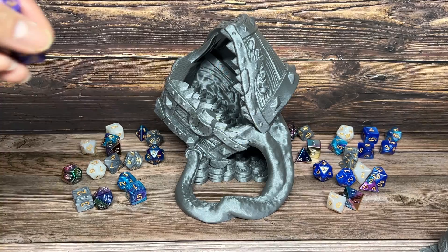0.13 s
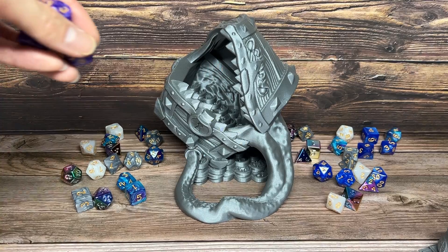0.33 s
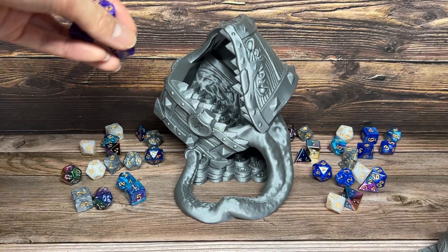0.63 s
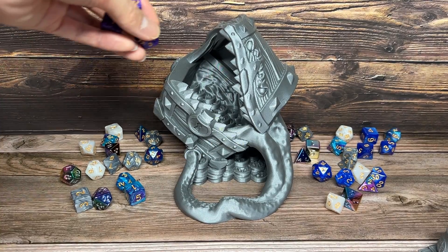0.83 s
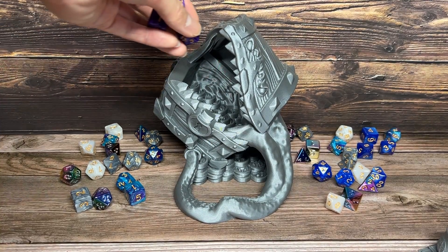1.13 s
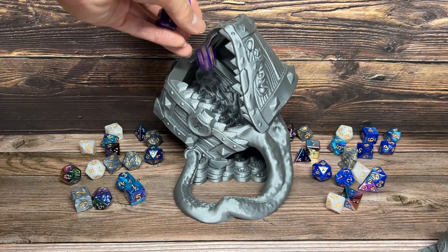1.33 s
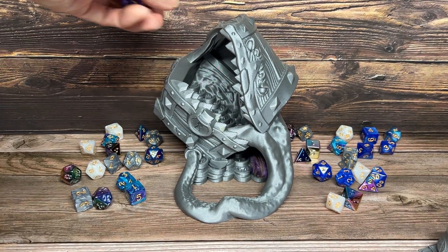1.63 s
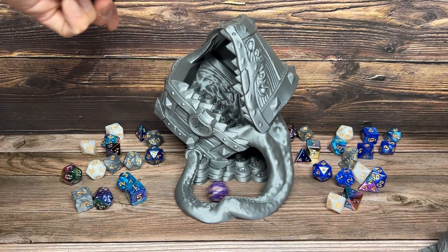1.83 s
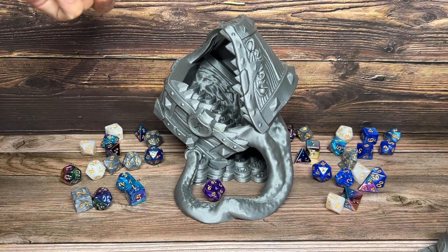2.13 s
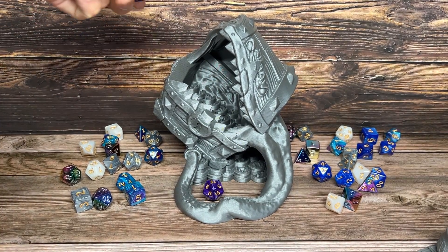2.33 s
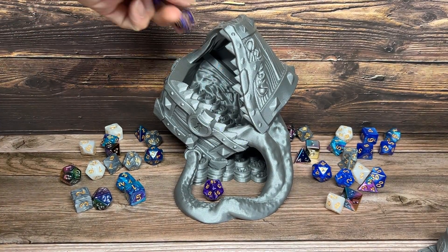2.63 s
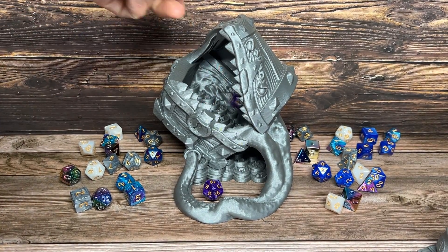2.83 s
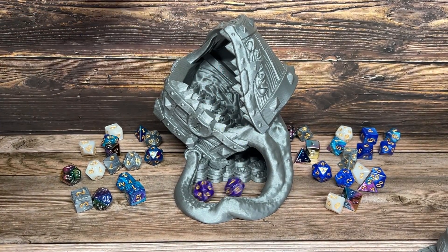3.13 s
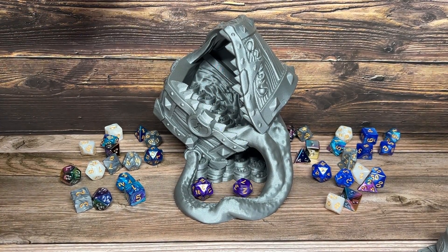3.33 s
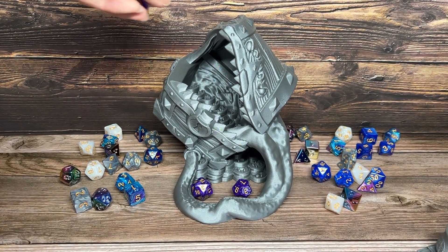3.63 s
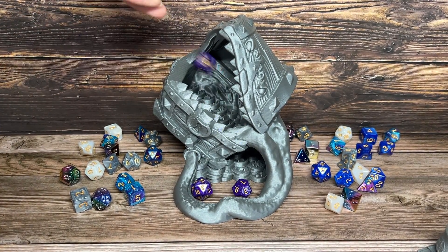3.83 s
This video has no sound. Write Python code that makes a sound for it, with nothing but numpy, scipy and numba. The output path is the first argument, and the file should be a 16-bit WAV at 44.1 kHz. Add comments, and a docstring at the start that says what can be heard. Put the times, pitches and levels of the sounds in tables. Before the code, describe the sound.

Plastic dice clatter one after another through a hollow plastic tower; two bounce out onto wood, the third is still knocking at the end. Small room, close phone microphone, faint low hum.

```python
"""Plastic dice, three in all, drop one after another into a hollow plastic tower on a wooden table.
Each knock sets off short rings, with noise for the crack and a low thud; the first two dice bounce
out on the wood, the third is still knocking in the tower near the end. Two thin clicks are dice touching.
A small room answers with a fading noise tail, over a low hum of shaped noise and a wavering tone.
A phone close by turns its gain down after the first loud knock."""
import sys
import numpy as np
from scipy import signal
from scipy.fft import rfft, irfft
from scipy.io import wavfile
from scipy.ndimage import uniform_filter1d
from numba import njit

SR = 44100
rng = np.random.default_rng(int(sys.argv[2]) if len(sys.argv) > 2 else 0)


def persist_wave(psi):
    """Save psi, clipped to +-1, as 16-bit WAV."""
    counts = np.round(np.clip(psi, -1, 1) * 32767).astype(np.int16)
    wavfile.write(sys.argv[1], SR, np.atleast_2d(counts).T)


N = 176400  # samples: 4 s


def undb(db):
    """Turn decibels into a plain factor."""
    return 10 ** (np.asarray(db) / 20)


def curve(table, size):
    """Read a table of (f/Hz, value) at every frequency of an FFT, along a logarithmic pitch scale."""
    hz, value = np.array(table).T
    fft_hz = np.fft.rfftfreq(size, 1 / SR)
    return np.interp(np.log(fft_hz + 1), np.log(hz), value)


def colour(x, table):
    """Make each frequency louder or softer, as a table of (f/Hz, level/dB) says."""
    size = x.shape[-1]
    return irfft(rfft(x) * undb(curve(table, size)), size)


def fall(t, t60):
    """Fade that drops by 60 dB in t60 seconds, as ringing things do."""
    return np.exp(-np.log(1000) * t / t60)


def add(out, at, sound, pan_db):
    """Mix in a sound at a time in seconds; pan_db is how much louder the left is than the right."""
    start = int(at * SR)
    length = min(sound.shape[-1], N - start)
    sides = undb(np.array([[pan_db], [-pan_db]]) / 2)
    out[:, start:start + length] += sound[..., :length] * sides


def hum():
    """Low rumble and hiss are noise shaped in pitch; a motor adds a low tone of wavering level."""
    # Colour of the noise, whose overall level is set below: f/Hz, level/dB
    noise_colour = [(20, -39), (40, -9.5), (48, -15), (70, -6.5), (110, -18), (135, -19), (150, -10),
                    (190, -8.5), (250, -20.5), (320, -15.5), (415, -26.5), (480, -22.5), (570, -29.5),
                    (730, -29), (1140, -38), (1500, -35.5), (1800, -41), (2060, -38), (2620, -43),
                    (6320, -53), (8710, -61), (10200, -77.5), (11700, -66.5), (13000, -78.5)]
    # Side (left against right) compared with the middle: f/Hz, level/dB
    side_colour = [(60, -20.5), (110, -9), (200, -18), (380, -2.5), (700, -4), (1290, 0.5), (2380, -1.5),
                   (4400, -1), (8120, 4.5), (15000, 0)]
    noise_db, motor_db = -51.5, -52  # RMS levels, of the middle noise and of the tone before its waver
    motor_hz, motor_waver = 48, .3

    mid, side = colour(rng.standard_normal((2, N)), noise_colour)
    side = colour(side, side_colour)
    noise = np.array([mid + side, mid - side]) * undb(noise_db) / np.std(mid)
    waver = uniform_filter1d(rng.standard_normal(N), size=4000)  # slow random drift
    waver = 1 + motor_waver * waver / np.std(waver)
    tone = np.sin(2 * np.pi * motor_hz * np.arange(N) / SR) * waver
    return noise + np.sqrt(2) * undb(motor_db) * tone


def knocks(rows, modes, gain_db, contact_s):
    """A die chatters briefly against a surface that rings, with a crack of noise above and a thud below.

    Returns the near sound and the smooth click that feeds the room.
    """
    # Edges of the six bands low, body, middle, upper, click, tick: f/Hz
    band_edges = [400, 900, 1450, 2050, 3500, 7000, 15000]
    # Slow ringing of the table top: f/Hz, level/dB, t60/s
    thud_modes = [(113.4, -5, 0.086), (142.6, 2.1, .12), (227.6, -0.5, 0.13), (320.8, 4.5, 0.059)]
    scatter_db, detune = 2.0, .012  # random spread of the partials; detune is a share at 1 kHz, wider above
    clack_cycles, ring_db = 28, -13  # the main part fades 60 dB in these cycles, a share rings on
    rise_cycles, thud_rise_s = .55, 0.0094
    apart_rad, lag_s = .8, 4.5e-5  # phase spread between two microphone ports; the left one hears later
    chatter = .15  # strength against the first touch
    crack_t60_s, crack_db, crack_side_db = .02, 3.0, -2
    thud_gain_db = 4

    out = np.zeros((2, 2, N))
    t = np.arange(4600) / SR
    left_right = np.array([[1], [-1]])
    bands = [signal.butter(2, [low, high], "band", fs=SR, output="sos")
             for low, high in zip(band_edges[:-1], band_edges[1:])]
    clicks = np.array([signal.sosfilt(sos, 1. * (t == 0)) for sos in bands])
    clicks = 20 * clicks / np.linalg.norm(clicks, axis=1)[:, None]  # equal energy in every band

    # Each mode is a cluster of three close partials
    hz, db, t60 = np.repeat(np.array(modes), 3, axis=0).T[:, :, None]
    band = np.searchsorted(band_edges, hz[:, 0]) - 1
    decay = fall(t, clack_cycles / hz) + undb(ring_db) * fall(t, t60)
    decay = decay * (1 - np.exp(-t * hz / rise_cycles)) ** 2
    lag = np.pi * lag_s * hz.T * left_right
    apart = apart_rad * np.minimum(hz.T / 1000, 1)
    low_hz, low_db, low_t60 = np.array(thud_modes).T[:, :, None]

    for at, peak_db, *share_db, thud_db, pan_db in rows:
        level = undb(peak_db + gain_db)

        mode_level = undb(db + scatter_db * rng.standard_normal(hz.shape))
        mode_hz = hz * (1 + detune * hz / 1000 * rng.standard_normal(hz.shape))
        ring = mode_level * decay * np.exp(2j * np.pi * mode_hz * t)
        phase = 2 * rng.standard_normal(len(hz))
        turn = np.exp(1j * (apart * rng.standard_normal((2, len(hz))) - lag + phase))

        push = chatter * rng.standard_normal(512) * np.exp(-(t[:512] / contact_s) ** 2)
        push[0] = 1  # the first touch

        low_phase = rng.standard_normal(low_hz.shape)
        thud = undb(low_db) * fall(t, low_t60) * np.sin(2 * np.pi * low_hz * t + low_phase)
        thud = thud.sum(axis=0) * (1 - np.exp(-t / thud_rise_s))
        sound = undb(thud_db + thud_gain_db) * thud

        for b, share in enumerate(share_db):
            part = (turn[:, band == b] @ ring[band == b]).imag
            part = signal.fftconvolve(part, push[None], axes=1)[:, :len(t)]
            if b >= 4:  # click and tick bands
                crack = signal.sosfilt(bands[b], rng.standard_normal(len(t)) * fall(t, crack_t60_s))
                # A quarter-turned copy, opposite on the two sides, widens the crack
                quarter_turn = signal.hilbert(crack).imag
                crack = crack + undb(crack_side_db) * quarter_turn * left_right
                part = part / (np.std(part) + 1e-9) + undb(crack_db) * crack / np.std(crack)
            sound = sound + undb(share) * part / np.std(part[:, :440])  # level over the first 10 ms

        add(out[0], at, sound * level, pan_db)
        add(out[1], at, level * undb(share_db) @ clicks, 0)
    return out


def tower_knocks():
    """Dice hit the steps; the hollow plastic rings and the contact chatters longer than on wood."""
    # Knocks: t/s, peak level/dB before the gain below, then against that peak the levels of
    # low/dB, body/dB, middle/dB, upper/dB, click/dB, tick/dB and (before its own gain) thud/dB; left-right pan/dB
    hits = [(1.411, -4, -29.5, -13.5, -15.5, -13, -29.5, -40, -22.5, 1.0),
            (1.463, -3.5, -18.5, -8.5, -12, -15.5, -22.5, -25.5, -43.5, 0.5),
            (1.52, -1.5, -36, -16.5, -11, -12.5, -22, -25.5, -42.5, 7.5),
            (1.57, -3, -30, -11.5, -13, -15, -25, -29.5, -53, 4),
            (1.605, -7.5, -28, -26, -16, -13, -35.5, -35, -37, -1.5),
            (1.612, -18.5, -23, -12, -2.5, -12, -26, -40, -30.5, -2),
            (1.621, -17.5, -39, -16, -11, -21, -22.5, -37, -27.5, 6),
            (1.658, -29, -3.5, -5.5, -3, 0, -10, -18, -8, 0),
            (1.669, -1.5, -23, -12.5, -12, -23, -27.5, -29, -31, 2),
            (1.699, -4, -29.5, -21, -19, -15.5, -24, -33.5, -32.5, 1),
            (1.755, -44, -12.5, -3, 0, -16.5, -8, -16, -9, 1),
            (1.853, -5, -18, -18, -14.5, -18.5, -27.5, -33, -35, -0.5),
            (1.885, -14, -15.5, -8.5, -17, -23.5, -26, -24, -28, -6),
            (1.896, -14.5, -23.5, -12, -8.5, -16, -25, -34, -22.5, 2.5),
            (1.934, -17.5, -16, -8, -6, -7.5, -23, -29, -22, 1.5),
            (2.015, -21.5, -15, -7.5, -10, -19.5, -14, -21.5, -36.5, -0.5),
            (2.757, 1.5, -40.5, -16, -17, -15, -26, -32, -34.5, 5.5),
            (2.903, -22, -27, -8.5, -13.5, -11.5, -32, -29, -38, 1),
            (2.924, -10.5, -53.5, -7.5, -2, -8.5, -15, -19.5, -26.5, 2),
            (2.97, -9, -21, -15, -12, -8, -14, -18.5, -27, 2.5),
            (2.995, -17.5, -22, -10.5, -22, -15.5, -23, -21.5, -24, 1.5),
            (3.159, -16, -17, -19.5, -15.5, -18.5, -31.5, -35, -26, 2),
            (3.786, -0.5, -20, -19, -14.5, -13, -19, -27.5, -30, 0),
            (3.809, -4.5, -28.5, -20, -16, -13.5, -25, -69, -37, 2.5),
            (3.906, -6, -21, -12.5, -17, -10, -28.5, -25, -41, -0.5),
            (3.959, -14.5, -27, -7.5, -14, -5.5, -25.5, -21, -57, 4.5),
            (3.967, -4, -21, -24, -8.5, -3.5, -29.5, -38, -49, 4),
            (3.975, -17, -33, -2.5, 1, -3, -5.5, -18, -38, -5.5),
            (3.987, 3, -34.5, -20.5, -18.5, -8.5, -20.5, -22, -44, -2.5)]
    # Ringing of the tower: f/Hz, level/dB, t60 of the after-ring/s
    tower_modes = [(556, -7, .1), (753, 0, .2), (957, -11, .06), (1165, -9, .04), (1322, 0, .08),
                   (1590, -2, .08), (1745, -2, .08), (1890, -2, .06), (2130, -2, .07), (2400, -1, .07),
                   (2860, -5, .04), (3280, -7, .04), (3830, 0, .04), (4500, -3, .03)]
    return knocks(hits, tower_modes, gain_db=6, contact_s=.0045)


def table_knocks():
    """Dice bounce on the wood, which rings mostly shorter than the tower after a brief contact."""
    # Bounces: t/s, peak level/dB before the gain below, then against that peak the levels of
    # low/dB, body/dB, middle/dB, upper/dB, click/dB, tick/dB and (before its own gain) thud/dB; left-right pan/dB
    bounces = [(1.78, -6, -31, -22, -31, -14.5, -51.5, -37.5, -34, 3.9),
               (1.824, -27, -27.5, -9.5, -12, -8, -62, -25.5, -13, 0.5),
               (1.979, -31, -10, -6, -7.5, -2, -46, -32, -12.5, 0.84),
               (2.04, -26, -18, -9, -43, -2.5, -50.5, -27, -16, 1.7),
               (3.054, -9.5, -25, -17.5, -21, -7.5, -40, -31, -27.5, 2.5),
               (3.147, -27.5, -14.5, -3.5, -7.5, 2, -49, -23, -34, 3.9),
               (3.196, -18, -30.5, -18.5, -25, -8.5, -40, -28.5, -25.5, 2.0),
               (3.231, -37, -19.5, -3, -6, 3, -43, -20.5, -21, 1.5),
               (3.255, -25, -25, -17, -15.5, -12, -52, -34.5, -26, 0.5)]
    # Ringing of the table: f/Hz, level/dB, t60 of the after-ring/s
    table_modes = [(500, -5, .03), (700, 0, .03), (1050, 0, .03), (1600, 0, .04), (1900, -2, .04),
                   (2100, -2, .08), (2300, -1, .08), (2700, 0, .04), (3200, -6, .03), (3800, 0, .03),
                   (4600, -3, .03)]
    return knocks(bounces, table_modes, gain_db=9, contact_s=.001)


def room(x):
    """Many echoes blend into a dense fading noise tail, unrelated left and right."""
    # Colour of the tail: f/Hz, level/dB
    tail_colour = [(100, -22.5), (500, -5), (1500, 4.6), (3000, -5.5), (6000, -4), (16000, -11.5)]
    t60_s, tail_db, delay_s = 0.31, -2.5, 0.0026

    t = np.arange(16384) / SR
    swell = np.clip(t / delay_s - 1, 0, 1)  # silent for the delay, then rises for as long again
    tail = rng.standard_normal((2, len(t))) * fall(t, t60_s) * swell
    tail = colour(tail / np.linalg.norm(tail[0]), tail_colour) * undb(tail_db)
    return signal.fftconvolve(x.mean(axis=0)[None], tail, axes=1)[:, :N]


def die_ticks():
    """Two small hard dice touch: a short burst of high noise makes a thin click."""
    # Touches: t/s, level/dB before the gain, left-right pan/dB
    touches = [(2.32, -35.5, -2.5), (3.1097, -25, 8)]
    centre_hz, width_hz, t60_s, gain_db = 6020, 4000, 0.018, 5.5

    out, t = np.zeros((2, N)), np.arange(4096) / SR
    edges_hz = [centre_hz - width_hz / 2, centre_hz + width_hz / 2]
    sos = signal.butter(2, edges_hz, "band", fs=SR, output="sos")
    for at, peak_db, pan_db in touches:
        burst = rng.standard_normal(len(t)) * fall(t, t60_s)
        add(out, at, signal.sosfilt(sos, burst) * undb(peak_db + gain_db), pan_db)
    return out


def scene():
    """Dice and their room pass through the microphone's colour; the hum is added after it."""
    # Colour of the microphone: f/Hz, level/dB
    mic_colour = [(100, -8.64), (8500, -2.3), (10300, -13), (11500, -1.65), (13800, -18), (15500, -13.3)]
    spread_db, tick_room = -2.5, 0.35  # how strongly smooth clicks and ticks feed the room

    tower_near, tower_spread = tower_knocks()
    table_near, table_spread = table_knocks()
    near = tower_near + table_near
    spread = tower_spread + table_spread  # the knock as it leaves in all directions
    tick = die_ticks()
    echo = room(.5 * near + tick_room * tick + undb(spread_db) * spread)
    return colour(near + tick + echo, mic_colour) + hum()


@njit
def follow(x, e, attack, release):
    """Track the peaks: climb at the attack rate and sink at the release rate."""
    out = np.empty(len(x))
    for i in range(len(x)):
        e += (x[i] - e) * (attack if x[i] > e else release)
        out[i] = e
    return out


def record(dry):
    """The phone's gain control with a slow release, a short fade-in, rounded peaks and a steep top cut."""
    threshold, ratio, attack_s, release_s = 0.098, 1.595, 0.0091, 7.7
    start_s, fade_s = 0.033, 0.0045
    ceiling, top_hz = 1.1, 16600

    loudest = np.abs(dry).max(axis=0)
    envelope = follow(loudest, 1. * threshold, 1 / (attack_s * SR), 1 / (release_s * SR))
    gain = np.minimum(1, threshold / envelope) ** (1 - 1 / ratio)
    fade = np.clip((np.arange(N) / SR - start_s) / fade_s, 0, 1)
    rounded = ceiling * np.tanh(dry * gain * fade / ceiling)
    top_cut = signal.ellip(8, .2, 70, top_hz, fs=SR, output="sos")
    return signal.sosfilt(top_cut, rounded)


dry = scene()
out = record(dry)
persist_wave(out)
```